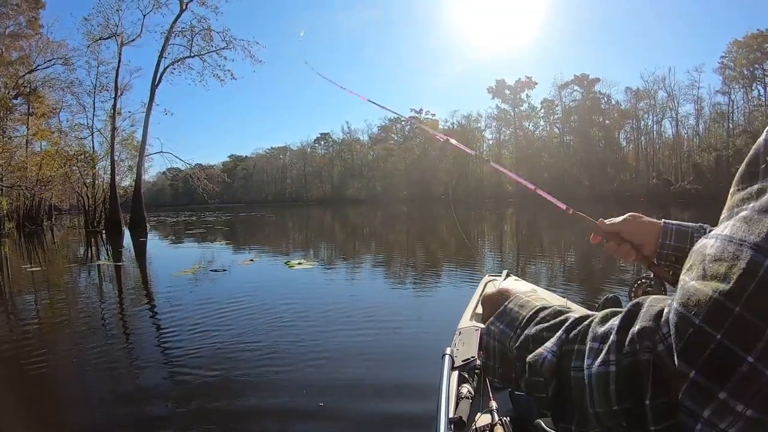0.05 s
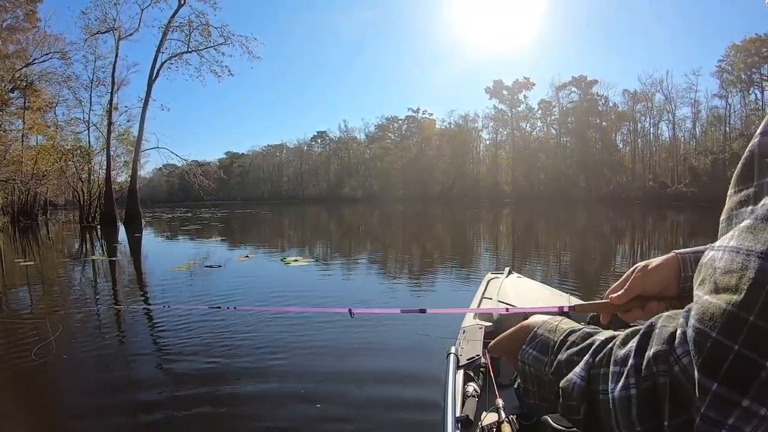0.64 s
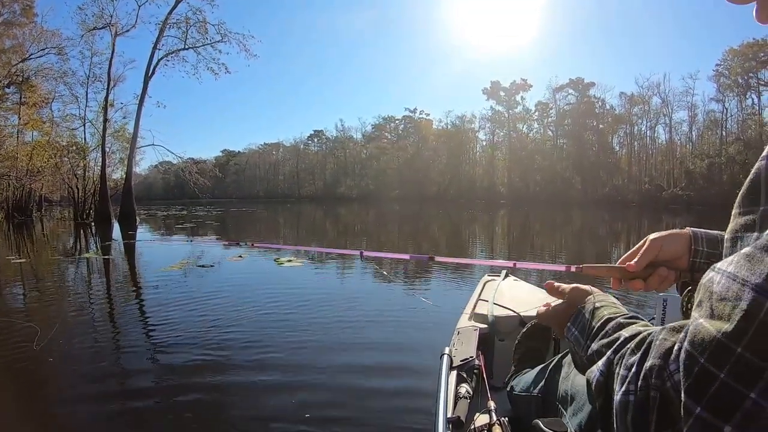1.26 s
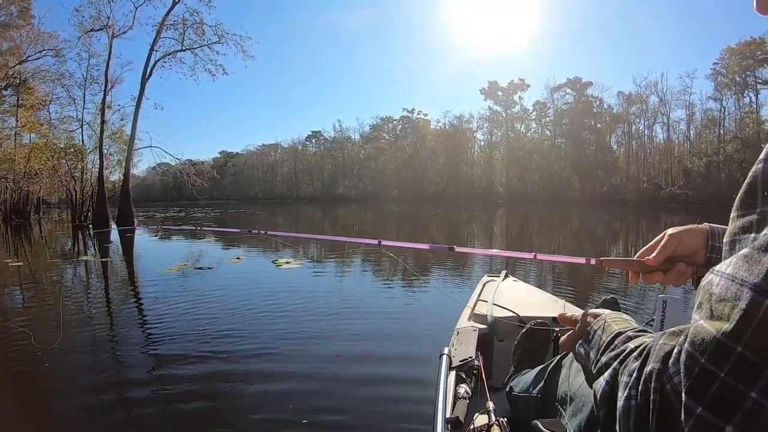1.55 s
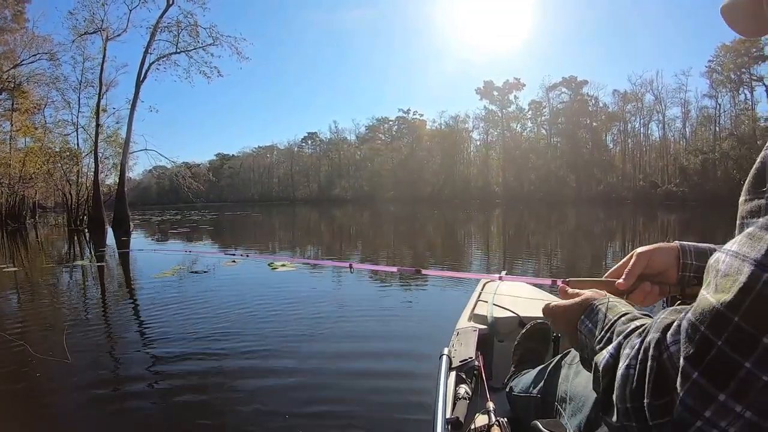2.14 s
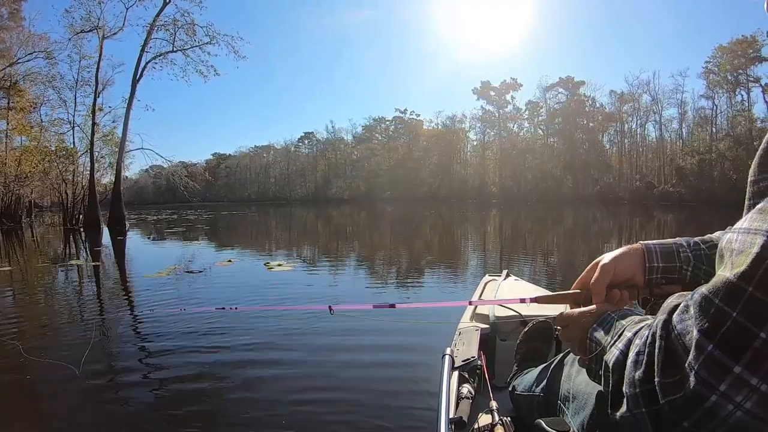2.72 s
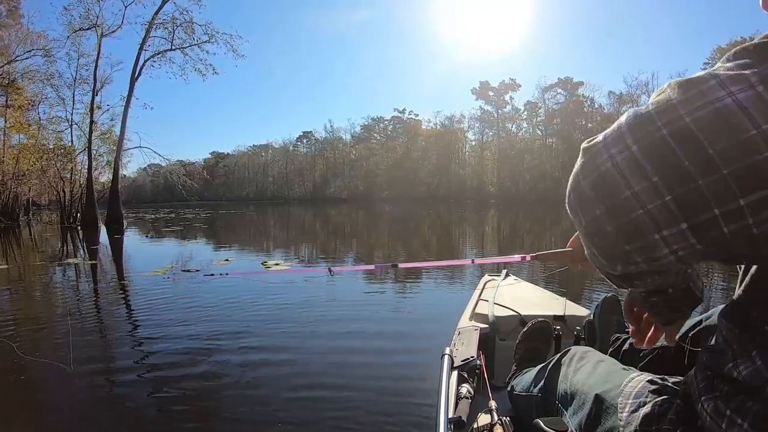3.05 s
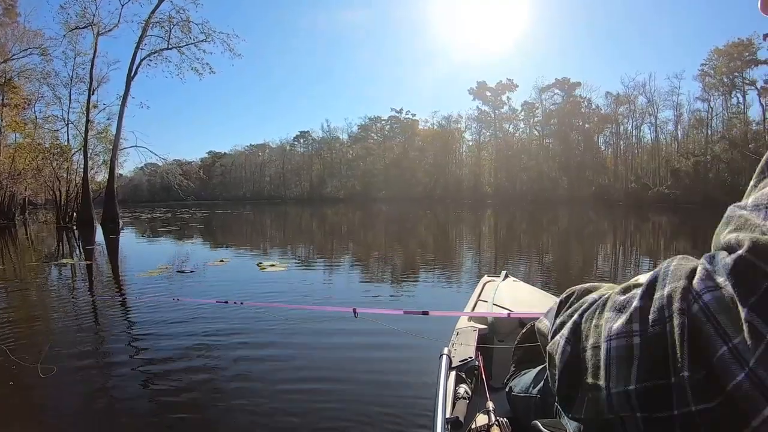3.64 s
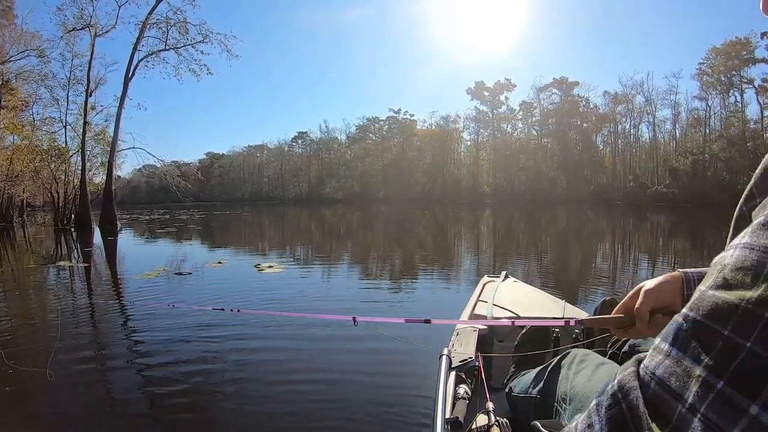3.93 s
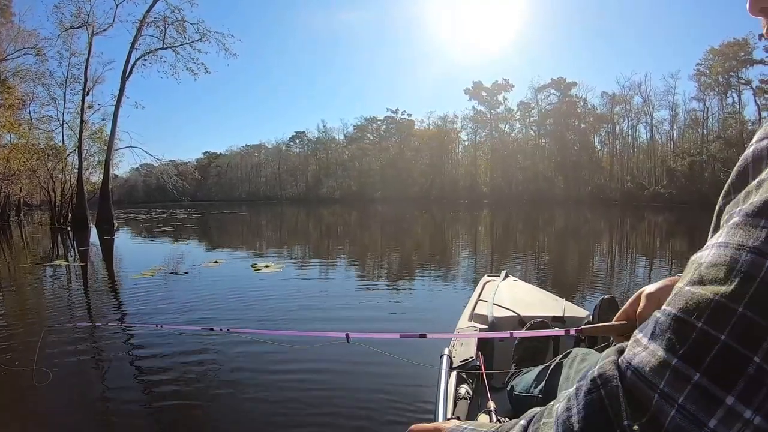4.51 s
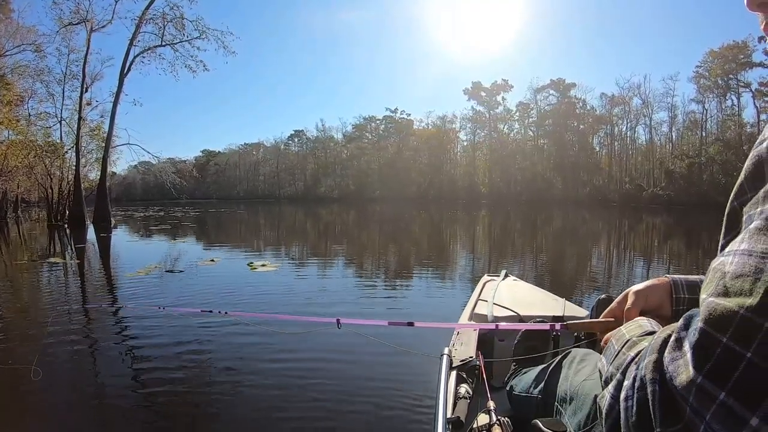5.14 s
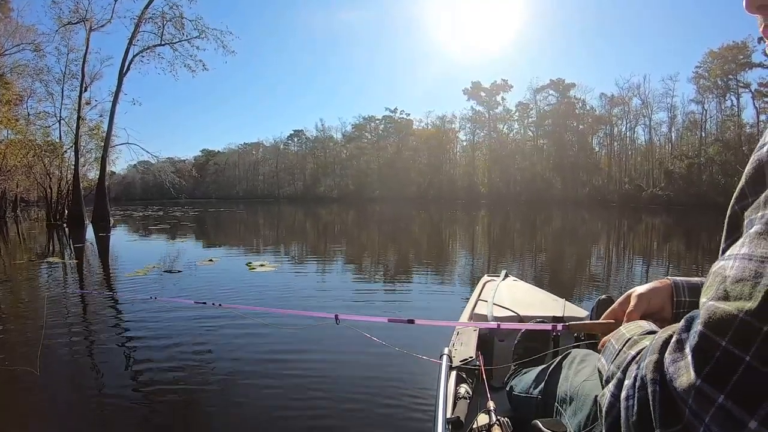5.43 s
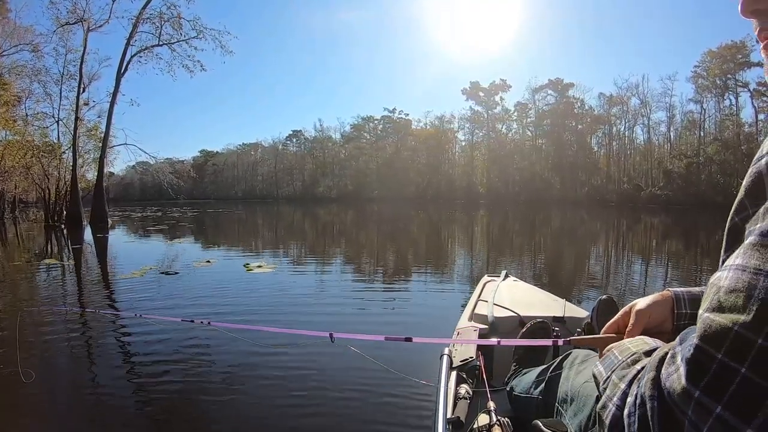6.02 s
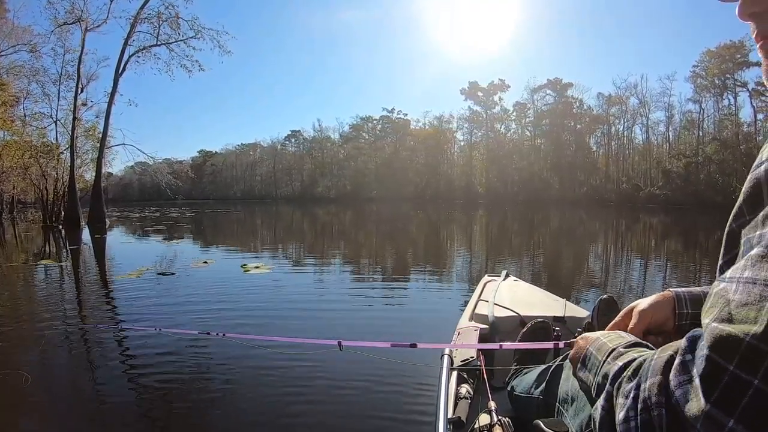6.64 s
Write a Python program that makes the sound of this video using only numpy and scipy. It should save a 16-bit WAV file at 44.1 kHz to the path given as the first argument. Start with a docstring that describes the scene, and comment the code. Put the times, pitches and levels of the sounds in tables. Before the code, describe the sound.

A cast whirs, then handled gear raps, thumps and ticks in a plastic kayak while small birds chirp faintly.

```python
"""An angler in a plastic kayak on a still river. Line hisses off the spool after a cast; something raps the rim
and the spool ticks to a stop. A knee or arm bumps the hull, a sleeve rubs. Near 4 s gear is moved on the deck:
it knocks, clicks, clinks and drags, and the hollow hull booms on the right. The reel then turns in dry ticks,
with two last clicks. Throughout, over a low distant hum, one small bird in the bank woods sings rising whistles
that end in a rough rising note, while another gives sharp chips."""
import sys
import numpy as np
from scipy import signal
from scipy.fft import rfft, irfft, next_fast_len
from scipy.io import wavfile
from scipy.ndimage import map_coordinates

SR = 44100
rng = np.random.default_rng(int(sys.argv[2]) if len(sys.argv) > 2 else 0)


def dump_mix(stems):
    """Bounce the given channels to the path in sys.argv[1] as a 16-bit WAV at rate SR."""
    frames = np.atleast_2d(stems).T  # one column per channel
    limited = np.clip(frames, -1, 1)  # hard clip at full scale
    pcm = np.round(limited * 32767).astype(np.int16)
    wavfile.write(sys.argv[1], SR, pcm)


N = 298557


def amp(db):
    return 10 ** (np.asarray(db) / 20)


def unit(x):
    return x / np.sqrt(np.mean(x ** 2) + 1e-20)


def along(points, hz):
    """Interpolate (f/Hz, value) points on a log frequency axis."""
    f, v = np.transpose(points)
    return np.interp(np.log(hz + 1), np.log(f + 1), v)


def wobble(rate_hz, size=N):
    """Smooth random curve, rate_hz knots a second."""
    knots = rng.standard_normal(int(size * rate_hz / SR) + 4)
    return map_coordinates(knots, [np.arange(size) * rate_hz / SR])


def sine(hz):
    """Sine following a per-sample frequency."""
    return np.sin(2 * np.pi * np.cumsum(hz) / SR)


def filtered(x, response):
    """Zero-phase filter with gain response(hz)."""
    n = x.shape[-1]
    m = next_fast_len(n + 8192)
    return irfft(rfft(x, m) * response(np.fft.rfftfreq(m, 1 / SR)), m)[..., :n]


def butter(x, hz, kind, order=2):
    """Causal low-pass or high-pass."""
    return signal.sosfilt(signal.butter(order, hz, kind, fs=SR, output="sos"), x)


def noise(colour, corr, size=N):
    """Coloured stereo noise, rms 1; corr is the L-R correlation, one value or (f/Hz, value) points."""
    def angle(hz):
        return np.arccos(np.clip(corr if np.isscalar(corr) else along(corr, hz), -1, 1)) / 2
    a, b = rng.standard_normal((2, size))
    mid = filtered(a, lambda hz: amp(along(colour, hz)) * np.cos(angle(hz)))
    side = filtered(b, lambda hz: amp(along(colour, hz)) * np.sin(angle(hz)))
    return unit(np.array([mid + side, mid - side]))


def band(hz, width_hz):
    """Stereo noise in one resonance, rms 1."""
    white = rng.standard_normal((2, N))
    return unit(filtered(white, lambda f: 1 / (1 + (2 * (f - hz) / width_hz) ** 2)))


def patches(x, depth_db, bins, frames):
    """Friction flutter: random gain in patches of frequency and time; rms 1."""
    spectrum = signal.stft(x, nperseg=512)[2]
    rows, cols = np.indices(spectrum.shape[1:])
    field = map_coordinates(rng.standard_normal(rows.shape), [rows / bins, cols / frames])
    return unit(signal.istft(spectrum * amp(depth_db * field), nperseg=512)[1][:, :N])


def swells(rows):
    """Sum of bell-shaped gains; rows: peak t/s, length/s, level/dB."""
    t = np.arange(N) / SR
    return sum(amp(db) * 0.5 ** ((4 * (t - s) / length_s) ** 2) for s, length_s, db in rows)


def stroke(start_s, rise_s, hold_s, fade_db_per_s):
    """Gain that rises, holds, then fades."""
    t = np.arange(N) / SR - start_s
    return np.clip(t / rise_s, 0, 1) * amp(-fade_db_per_s * np.maximum(t - rise_s - hold_s, 0))


def pan(db):
    """Stereo gains for an L-R level difference."""
    return unit(amp([[db / 2], [-db / 2]]))


def add(track, s, sound):
    """Mix a sound in at time s."""
    part = track[:, max(round(s * SR), 0):]
    part[:, :sound.shape[-1]] += sound[..., :part.shape[1]]


def hit_time():
    """Time axis of a half-second event."""
    return np.arange(SR // 2) / SR


def onset(rise_s):
    return 1 - np.exp(-hit_time() / rise_s)


def ring(modes, scatter_db, phase_rad, waver=0):
    """Decaying modes (f/Hz, level/dB, t60/s) with random strengths, channel phases and pitch waver."""
    t = hit_time()
    hz, db, t60_s = np.transpose(modes)[:, :, None]
    gain = amp(db + scatter_db * rng.standard_normal(db.shape))
    polarity = np.pi * np.arange(len(modes))[:, None]
    phase = polarity + phase_rad * rng.standard_normal((2, len(modes), 1))
    clock = np.cumsum(1 + waver * wobble(93, len(t))) / SR
    envelope = gain / np.linalg.norm(gain) * amp(-60 * t / t60_s)
    return np.sum(envelope * np.sin(2 * np.pi * hz * clock + phase), axis=1)


def burst(colour, rise_s, t60_s, corr=0):
    """Noise puff that swells and decays."""
    t = hit_time()
    return noise(colour, corr, len(t)) * onset(rise_s) ** 2 * amp(-60 * t / t60_s)


# ambient spectrum: f/Hz, level/dB
AIR_COLOUR = [(25, -16.5), (90, -5), (175, 0.5), (250, -8), (500, -25), (780, -14.5), (1080, -28.5),
              (1800, -29.5), (3000, -35), (9500, -44.5)]
# ambient stereo image: f/Hz, L-R correlation
AIR_CORR = [(200, 0.93), (790, -0.58), (3000, -0.29), (9000, 0.95)]


def air():
    """Low distant hum and a thin hiss over the water."""
    return amp(-57) * noise(AIR_COLOUR, AIR_CORR) * amp(wobble(2.89))


def woods(song, scatter_t60_s=0.23, tail_t60_s=1.68):
    """Trunks scatter the song at once; far trees add a long faint tail."""
    t = np.arange(SR) / SR
    decay = amp(-60 * t / scatter_t60_s) + amp(-11 - 60 * t / tail_t60_s)
    response = rng.standard_normal((2, SR)) * decay / np.linalg.norm(decay)
    return signal.fftconvolve(song, response, axes=1)[:, :N]


# chips of one bird: t/s, level/dB
CHIPS = [(.28, -58), (1.668, -63.5), (2.565, -61.5), (3.464, -60), (4.711, -62), (5.996, -61), (6.632, -59)]
# chip spectrum: f/Hz, level/dB
CHIP_COLOUR = [(1700, -51.5), (2400, -9.5), (3300, -2), (5000, 4), (6500, -3), (9000, -29.5)]
# whistles of the other bird: top t/s, level/dB, top f/Hz
WHISTLES = [(1.813, -51, 4812), (3.132, -55, 4770), (4.606, -53.5, 4743), (6.226, -54, 4684)]
# whistle contour: t/s from the top, pitch ratio, level/dB
SLUR = [(-.13, .7, -22), (-.052, .86, -10), (-.024, .98, -1), (0, 1, 0), (.024, .985, -2), (.046, .82, -17)]
# rough rising notes ending the whistles: t/s, level/dB, start f/Hz
SECOND_NOTES = [(1.9, -61, 3550), (3.2, -65, 4550), (4.68, -65, 3980), (6.32, -64.5, 3520)]


def birds():
    """One bird gives rasping chips; another sings whistles that slur up, drop and end in a rough rising note."""
    rasps, whistles, t = np.zeros((2, N)), np.zeros((2, N)), hit_time()
    for s, db in CHIPS:
        gain = amp(db + 14 + 2 * wobble(400, len(t)))
        add(rasps, s, gain * burst(CHIP_COLOUR, rise_s=0.0079, t60_s=0.12, corr=0.98))
    slur_s, slur_ratio, slur_db = np.transpose(SLUR)
    ratio = np.interp(t + slur_s[0], slur_s, slur_ratio)
    shape_db = np.interp(t + slur_s[0], slur_s, slur_db, right=-np.inf)
    for s, db, top_hz in WHISTLES:
        hz = top_hz * ratio * (1 + 0.008 * wobble(400, len(t)))
        flutter_db = 3 * wobble(200, len(t))
        add(whistles, s + slur_s[0], amp(db + shape_db + flutter_db) * sine(hz))
    progress = np.clip(t / 0.22, 0, 1)
    for s, db, start_hz in SECOND_NOTES:
        hz = start_hz + 1150 * progress + 620 * np.tanh(wobble(700, len(t)))
        add(rasps, s, amp(db) * np.sin(np.pi * progress) * sine(hz))
    return rasps * pan(1.4) + whistles * pan(11) + woods(rasps + whistles) * pan(3.5)


# hull rumble spectrum: f/Hz, level/dB
ROCK_COLOUR = [(20, -23), (40, -3.5), (70, 2.5), (250, -25), (2000, -90)]


def rocking():
    """The hull rumbles faintly as the boat rocks."""
    rumble = unit(noise(ROCK_COLOUR, corr=0.95) * amp(3.1 * wobble(16)))
    return amp(-64) * rumble * pan(-1.5)


# arm movements: peak t/s, length/s, level/dB
ARM_MOVES = [(2.02, 0.34, -67), (2.93, 0.74, -68), (3.46, 0.58, -61.5), (3.87, 0.36, -65.5)]
# flannel spectrum: f/Hz, level/dB
CLOTH_COLOUR = [(300, -5.5), (1800, -0.5), (2800, -6), (8500, -7.5)]


def sleeve():
    """Flannel rubs as the arm moves."""
    friction = patches(noise(CLOTH_COLOUR, corr=0.5), depth_db=2.5, bins=10, frames=10)
    return swells(ARM_MOVES) * unit(friction * amp(2 * wobble(140)))


# line friction spectrum: f/Hz, level/dB
LINE_COLOUR = [(400, -21.5), (2000, -9), (3100, -8.5), (4400, -3.5), (6500, -5), (9000, -4)]
# line and spool resonances: peak t/s, length/s, level/dB, f/Hz, width/Hz
WHIRRS = [(0.024, 0.1, -44.5, 4520, 1300), (0.025, 0.16, -53, 1870, 900), (0.097, 0.06, -45.5, 8900, 2200),
          (0.414, 0.07, -58, 3900, 2200), (0.692, 0.27, -62.5, 1760, 260), (5.62, 0.53, -76, 1890, 900)]
# line singing in the rod rings: peak t/s, length/s, level/dB
SINGS = [(.21, 0.11, -58), (.38, 0.12, -60), (.58, 0.1, -62.5)]
RUSH_DB, RUSH_HOLD_S, RUSH_FADE_DB_PER_S = -42.5, 0.11, 397
RUNOUT_DB, RUNOUT_FADE_DB_PER_S = -44.5, 39.5


def cast():
    """Line rubs over the spool lip and through the rings: a rush, then a run-out as the lure slows."""
    t = np.arange(N) / SR
    rush = amp(RUSH_DB - RUSH_FADE_DB_PER_S * np.maximum(t - RUSH_HOLD_S, 0))
    runout = amp(RUNOUT_DB - RUNOUT_FADE_DB_PER_S * t)
    friction = patches(noise(LINE_COLOUR, corr=0.36), depth_db=5, bins=2, frames=5)
    hiss = np.hypot(rush, runout) * friction
    whirr = sum(swells([(s, length_s, db)]) * band(hz, width_hz)
                for s, length_s, db, hz, width_hz in WHIRRS)
    sing = swells(SINGS) * sine(7850 + 130 * wobble(580))
    return (hiss + whirr) * pan(-2.3) + sing


# spool stopping: t/s, level/dB
SPOOL_TICKS = [(0.8532, -58), (0.987, -55)]
# reel turning: t/s, level/dB
REEL_TICKS = [(4.572, -45), (4.61, -44.5), (4.637, -42.5), (4.675, -43.5), (4.7261, -41), (4.855, -43.5),
              (4.954, -47), (5.0332, -43)]
# reel tick spectrum: f/Hz, level/dB
REEL_COLOUR = [(100, -23), (468, 12), (750, -6.5), (1500, 0), (2600, -18), (9000, -30)]


def reel():
    """The spool stops with light ticks; the reel turns with blunt, dry ones."""
    out = np.zeros((2, N))
    for s, db in SPOOL_TICKS:
        add(out, s, amp(db - 4) * burst(LINE_COLOUR, rise_s=0.00055, t60_s=0.11, corr=0.3))
    for s, db in REEL_TICKS:
        add(out, s, amp(db) * pan(-7) * burst(REEL_COLOUR, rise_s=0.0005, t60_s=0.075, corr=0.4))
    return out


# nudges on the hull: t/s, level/dB, f/Hz
BUMPS = [(1.246, -39, 69.6), (1.566, -35, 62.3), (1.656, -36, 78), (1.724, -29, 46.7), (1.779, -36.5, 77.3),
         (3.071, -41.5, 86), (5.055, -40, 60)]


def bumps():
    """A padded arm or knee nudges the hull: a few low, damped cycles."""
    out = np.zeros((2, N))
    for s, db, hz in BUMPS:
        add(out, s, amp(db) * onset(0.0065) * ring([(hz, 0, 0.18)], scatter_db=1, phase_rad=0.54))
    return out * pan(-3)


# plastic snaps: t/s, level/dB, ring f/Hz, overtone f/Hz, crack/dB, L-R/dB
CLICKS = [(0.679, -44.5, 1655, 7000, -4.5, 1), (4.0942, -30.5, 2180, 3590, -1.5, -4),
          (4.155, -56.5, 2280, 5730, 12.5, -2), (4.1856, -32.5, 2180, 3270, -2, -4),
          (4.245, -41, 1985, 6280, -4, -2.5), (4.886, -29.5, 2224, 5720, -6, -11),
          (5.482, -47, 1825, 2660, -5.5, -4)]
# hard contact spectrum: f/Hz, level/dB
CRACK_COLOUR = [(400, 4.5), (750, -11.5), (1400, -3), (2300, -5), (3200, -12), (5500, -22), (10000, -22)]


def clicks():
    """Hard plastic parts snap together: crack, short ring, rough overtone, faint rattle."""
    out, t = np.zeros((2, N)), hit_time()
    attack = onset(0.00065)
    for s, db, hz, overtone_hz, crack_db, side_db in CLICKS:
        modes = [(hz * 0.65, -9, 0.035), (hz, 0, 0.04), (hz * 1.25, -4, 0.03)]
        tone = attack * ring(modes, scatter_db=0, phase_rad=0.97)
        crack = burst(CRACK_COLOUR, rise_s=0.00056, t60_s=0.042, corr=0.1)
        rattle = amp(-21) * burst(CRACK_COLOUR, rise_s=0.0012, t60_s=0.35)
        rough_hz = overtone_hz * (1 + 0.1 * wobble(2000, len(t)))
        overtone = attack * amp(-11.5 - 60 * t / 0.023) * sine(rough_hz)
        snap = tone + amp(crack_db) * (crack + rattle)
        add(out, s, amp(db + 4.5) * (snap * pan(side_db) + overtone))
    return out


# tool strike: t/s, level/dB
CLINKS = [(4.3168, -33)]
# tool modes: f/Hz, level/dB, t60/s
TOOL_MODES = [(724, 4.5, 0.084), (847, -1.5, 0.19), (1877, 9, 0.15), (2060, -0.5, 0.083)]


def clink():
    """A small tool is struck and rings."""
    out = np.zeros((2, N))
    for s, db in CLINKS:
        tone = ring(TOOL_MODES, scatter_db=0, phase_rad=0.93, waver=0.011)
        contact = amp(-2.5) * burst(CRACK_COLOUR, rise_s=0.0012, t60_s=0.025)
        add(out, s, amp(db) * (tone + contact))
    return out


# blows on the deck; the faint one at 1.84 s is a small wave slapping the hull: t/s, level/dB, low-pass f/Hz
KNOCKS = [(0.644, -47, 400), (1.836, -54.5, 500), (3.8522, -34, 900), (3.943, -54, 600), (3.9975, -32, 970),
          (4.017, -34.5, 450), (4.03, -41, 800), (4.095, -45, 1200), (4.157, -44, 900), (4.3822, -29, 776)]
# main deck modes: f/Hz, level/dB, t60/s
DECK_MODES = [(229, 1.5, 0.16), (382.4, 2.5, 0.084), (485, 0, 0.095), (614, 3.5, 0.039), (840, -6, 0.07),
              (1670, 4.5, 0.025), (1873, 3.5, 0.022)]
# spectrum of the dense small deck modes: f/Hz, level/dB
DECK_COLOUR = [(60, -26), (200, -0.5), (500, 6.5), (1000, -11), (2300, -7), (3300, -19.5), (9000, -34)]
REBOUND_DB, REBOUND_GAP_S = -9.5, 0.008


def knocks():
    """Gear hits the deck, rings its plate modes and rebounds; softer contacts are duller. Near 1.84 s a small
    wave slaps the hull in the same way."""
    out = np.zeros((2, N))
    for s, db, cutoff_hz in KNOCKS:
        blow = ring(DECK_MODES, scatter_db=7, phase_rad=0.79)
        blow += amp(-1) * burst(DECK_COLOUR, rise_s=0.00029, t60_s=0.053)
        for k, jitter in enumerate(rng.uniform(0.504, 1.4, size=4)):
            rebound = amp(REBOUND_DB) / (k + 1) * burst(CRACK_COLOUR, rise_s=0.00036, t60_s=0.022)
            add(blow, (k + jitter) * REBOUND_GAP_S, rebound)
        blow = butter(blow, cutoff_hz, "low", order=1)
        blow = butter(blow, 274, "high")  # the deck radiates little bass
        add(out, s, amp(db + 8) * butter(blow, 2940, "low", order=4))
    return out * pan(-4)


# blow on the rim: t/s, level/dB
RAPS = [(0.5572, -25)]
# rim modes: f/Hz, level/dB, t60/s
RIM_MODES = [(233, -11, 0.15), (450, -3, 0.16), (703, 0.5, 0.083), (876, 8.5, 0.041), (1210, -2, 0.05)]


def rim_rap():
    """Something set down on the rim rings it and the small deck modes."""
    out = np.zeros((2, N))
    for s, db in RAPS:
        rim = onset(0.0012) * ring(RIM_MODES, scatter_db=1, phase_rad=0.7)
        deck = amp(-6) * burst(DECK_COLOUR, rise_s=0.00044, t60_s=0.066, corr=0.23)
        add(out, s, amp(db) * butter(rim + deck, 1770, "low"))
    return out * pan(-8.5)


def pull():
    """Gain of one long pull across the deck."""
    return amp(-44) * stroke(start_s=4.09, rise_s=0.039, hold_s=0.16, fade_db_per_s=82)


# deck friction spectrum: f/Hz, level/dB
DRAG_COLOUR = [(80, -4.5), (280, -1.5), (500, -7), (1100, -14.5), (2300, -23.5), (3300, -34), (9000, -41.5)]


def dragging():
    """Gear scrapes the deck: a skid after each knock, and the long pull."""
    skids = sum(amp(db - 15.5) * stroke(s, rise_s=0.0089, hold_s=0, fade_db_per_s=157)
                for s, db, _ in KNOCKS)
    friction = patches(noise(DRAG_COLOUR, corr=0.23), depth_db=3.5, bins=3.02, frames=2.5)
    return np.hypot(skids, pull()) * friction * pan(-1.8)


# weight landing on the hull: t/s, level/dB, push length/s, t60 factor
THUMPS = [(3.8578, -18, 0.0054, 0.81), (3.9415, -20.5, 0.0075, 0.8), (4.003, -14.5, 0.0028, 0.7),
          (4.0125, -0.5, 0.025, 0.45), (4.1866, -23.5, 0.0012, 1.1), (4.375, -7.5, 0.0078, 0.97)]
# hull modes: f/Hz, level/dB, free t60/s
HULL_MODES = [(47.5, -8, 0.35), (66.4, 3, 0.45), (82.3, 0, 0.22), (147.9, 1, 0.31)]


def hull_booms():
    """Each push of weight sets the hollow hull booming; longer pushes excite less of its top."""
    out, t = np.zeros((2, N)), hit_time()
    for s, db, length_s, t60_factor in THUMPS:
        push = t * np.exp(-4 * t / length_s)
        modes = np.array(HULL_MODES) * [1, 1, t60_factor]
        response = ring(modes, scatter_db=0.5, phase_rad=0, waver=0.078)
        add(out, s, amp(db) * signal.fftconvolve(response, push[None] / push.sum(), axes=1))
    return butter(out, 35, "high", order=1) * pan(-19.5)


def hull_drone():
    """The long pull judders and drives the hull modes."""
    judder = butter(rng.standard_normal((2, N)), 110, "high", order=1)
    response = ring(HULL_MODES, scatter_db=2, phase_rad=0, waver=0.11)
    drone = unit(signal.fftconvolve(judder, response, axes=1)[:, :N])
    return amp(8.5) * pull() * drone * pan(-14)


def scene():
    boat = knocks() + rim_rap() + hull_booms() + hull_drone() + rocking() + bumps()
    gear = clicks() + clink() + reel() + cast() + dragging()
    return boat + gear + sleeve() + birds() + air()


def record(dry, top_hz=9800):
    """Steep low-pass at the band limit."""
    return filtered(dry, lambda hz: 1 / np.sqrt(1 + (hz / top_hz) ** 200))


dry = scene()
out = record(dry)
dump_mix(out)
```